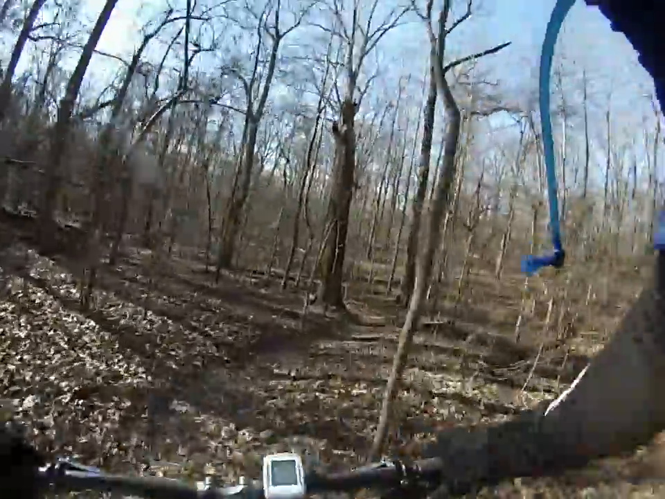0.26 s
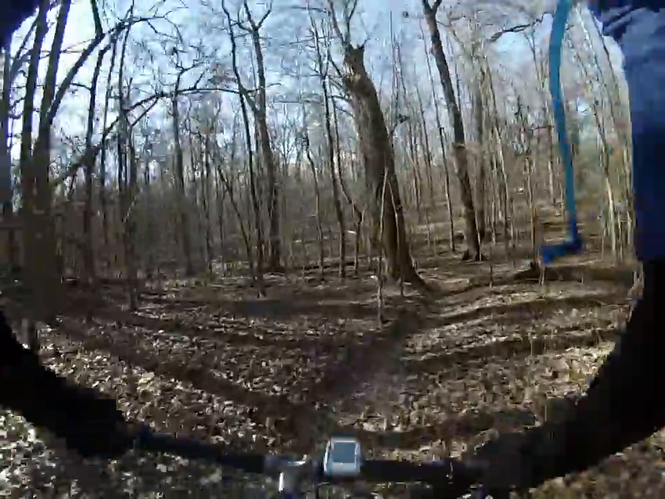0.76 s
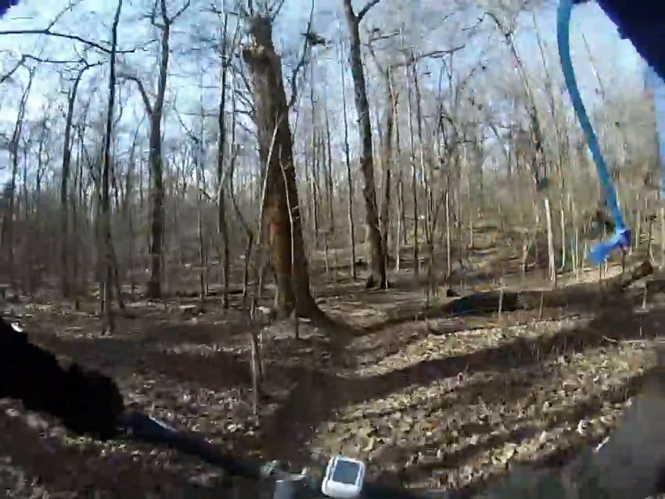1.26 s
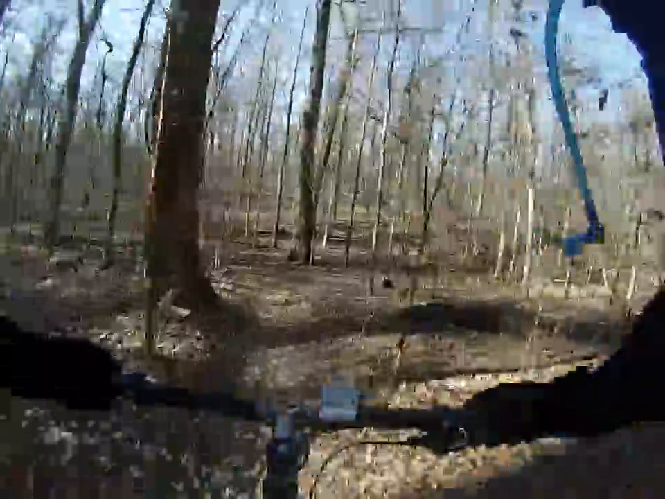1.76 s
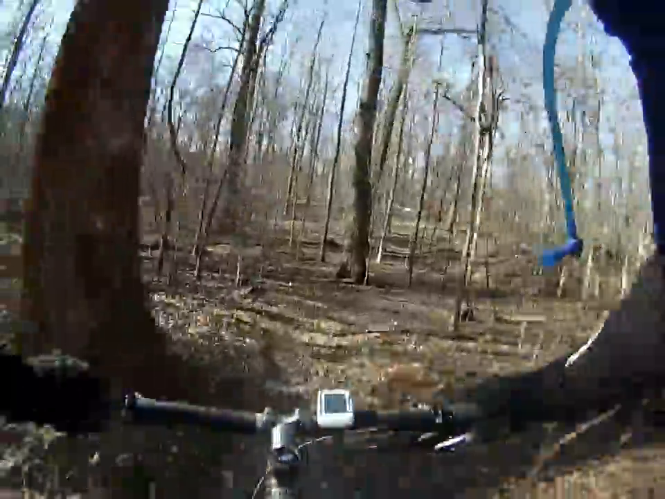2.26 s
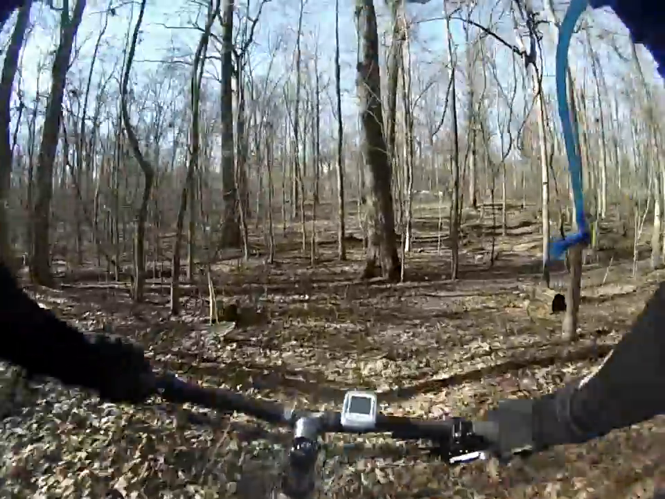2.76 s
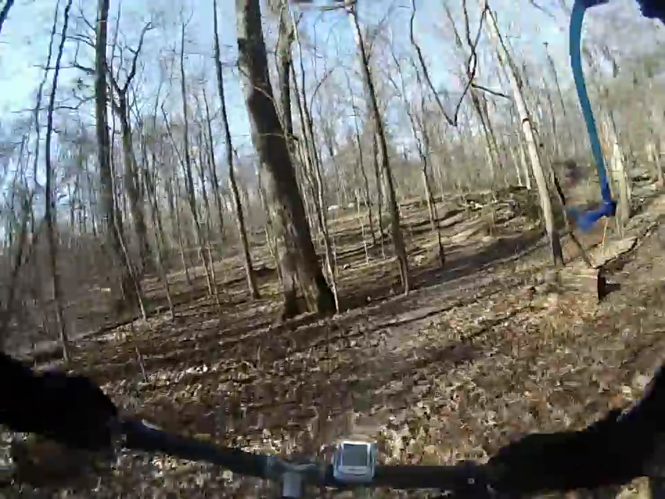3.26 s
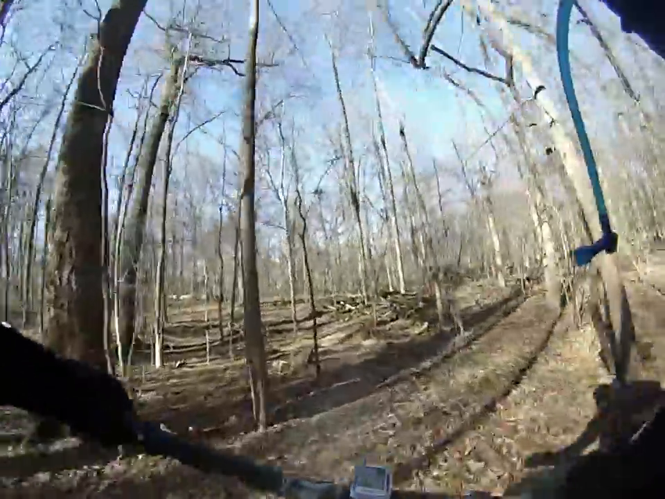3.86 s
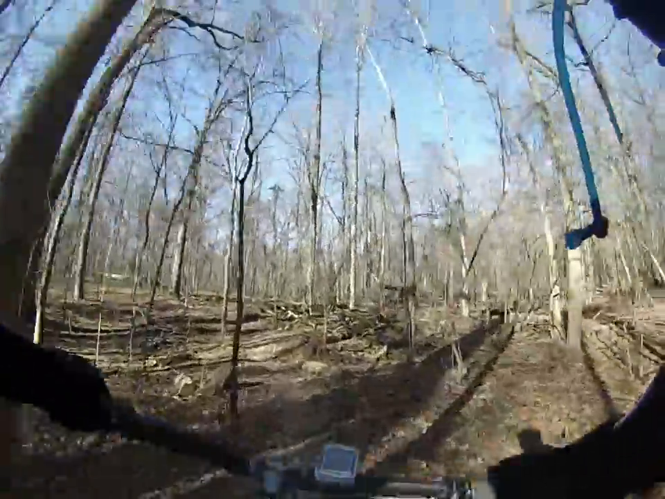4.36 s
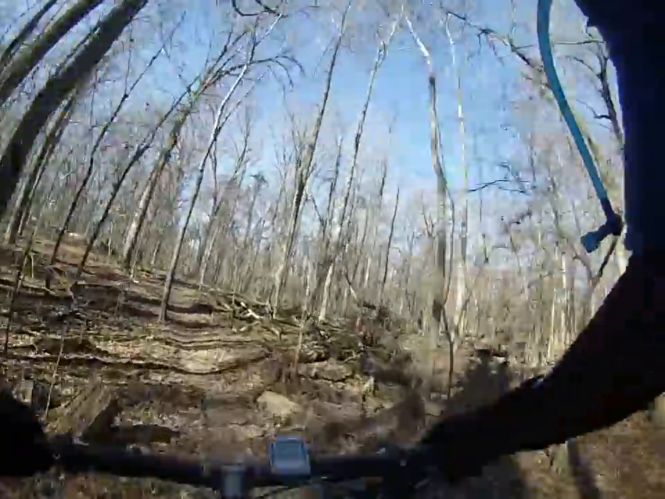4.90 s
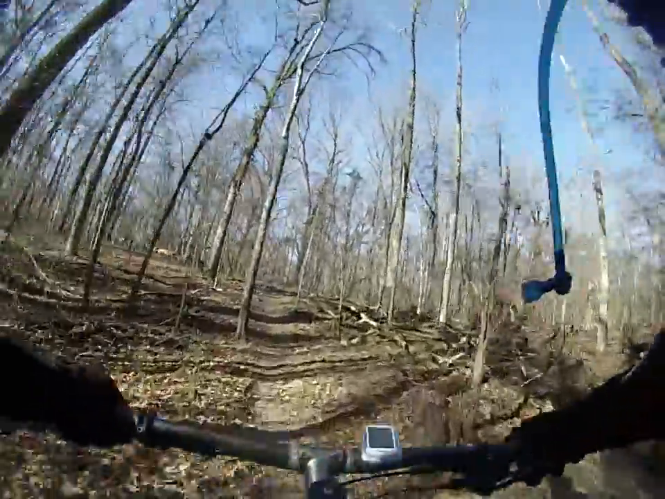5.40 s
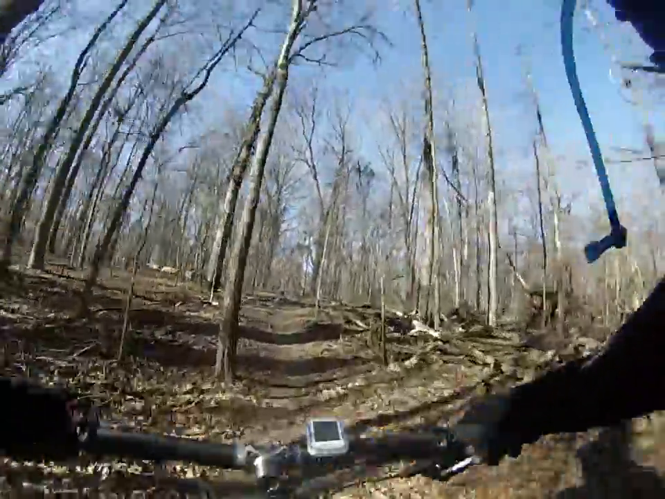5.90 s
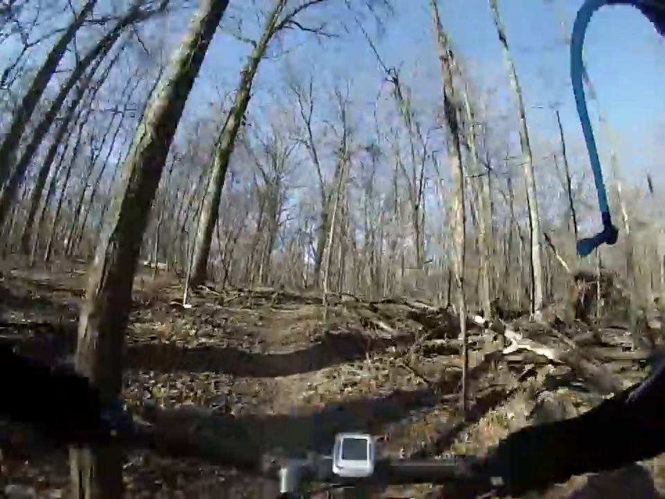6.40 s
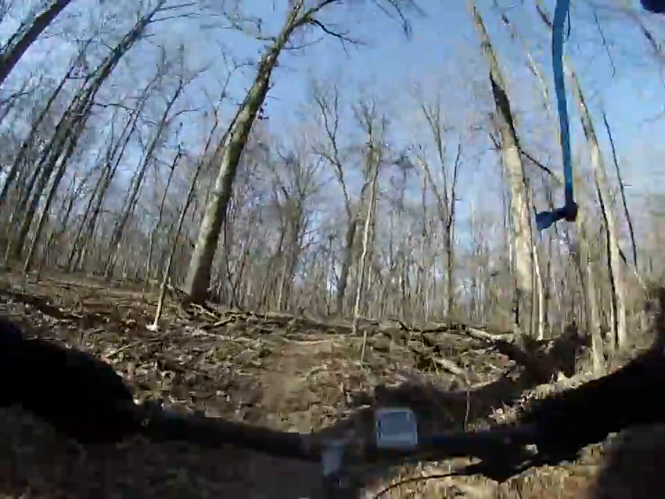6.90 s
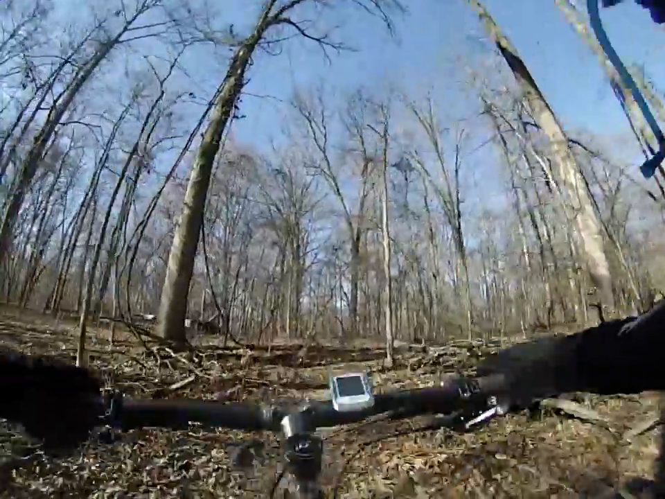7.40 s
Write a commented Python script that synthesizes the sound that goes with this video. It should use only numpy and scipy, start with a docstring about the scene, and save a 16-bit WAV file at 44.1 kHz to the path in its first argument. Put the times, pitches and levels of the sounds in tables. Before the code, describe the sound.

A mountain bike crunches through dry leaves on a dirt trail, chain rattling and frame knocking over roots, with low wind buffeting the microphone.

```python
"""A low buffet and a rattling chain come first, over the crunch of dry leaves under a mountain bike's tyres.
It rolls down a dirt trail, with one cased microphone close by, in the camera on the rider's chest.
The tyres crush leaves (filtered noise and fractures), snap twigs and thud on roots; chain and frame knock.
Bumps and pedal strokes swing the camera in slow pulses, and the brake disc rings in decaying sines.
Wind presses on the case as lumpy low noise, and the resonances of the case colour everything."""
import sys
import numpy as np
from scipy.fft import rfft, irfft, next_fast_len
from scipy.io import wavfile
from scipy.ndimage import map_coordinates

SR = 44100
rng = np.random.default_rng(int(sys.argv[2]) if len(sys.argv) > 2 else 0)


def unload_wav(signal):
    """Save mono or channel-first audio to the path in sys.argv[1] as 16-bit WAV at rate SR, clipped to [-1, 1]."""
    wavfile.write(
        sys.argv[1],
        SR,
        np.round(np.clip(np.atleast_2d(signal).T, -1, 1) * 32767).astype(np.int16),
    )


N = 337365

# roughness of the trail, as tyre rumble before trims: (time [s], level [dB])
TRAIL_ROUGHNESS = [(0, -53.5), (.3, -58), (1.2, -57), (2.0, -58), (2.9, -55.5), (3.6, -53.5), (4.0, -58.5),
                   (4.35, -57), (5.0, -56), (5.9, -57.5), (6.4, -53), (6.8, -54.5), (7.3, -51.5),
                   (7.62, -57)]
# tyres meeting roots and stones, before trims: (time [s], level [dB], thud pitch [Hz])
ROOT_HITS = [(.4, -40.5, 108), (0.469, -52, 231), (.517, -65, 270), (0.621, -51, 182), (.663, -44, 116),
             (0.747, -43, 129), (0.843, -42, 119), (1.194, -43, 159), (1.428, -46, 119), (1.667, -45, 144),
             (1.805, -55, 140), (2.2, -42, 152), (2.435, -54, 110), (2.59, -37.5, 108), (2.958, -35.5, 101),
             (2.997, -42, 180), (3.17, -43.5, 200), (3.251, -47, 132), (3.335, -42, 94.5),
             (3.402, -49, 123), (3.5, -39.5, 133), (3.541, -48, 150), (3.619, -44, 125), (3.672, -46, 164),
             (3.758, -45, 115), (3.952, -45.5, 375), (3.999, -47, 225), (4.179, -42.5, 180),
             (4.576, -43.5, 95), (5.44, -45, 181), (5.815, -47, 140), (5.469, -46.5, 240),
             (6.024, -38, 115), (6.188, -41, 131), (6.267, -45.5, 156), (6.307, -36, 164),
             (6.344, -35, 153), (6.427, -31.5, 126), (6.498, -41, 127), (6.661, -32.5, 122),
             (6.686, -36.5, 151), (7.17, -41.5, 164), (7.276, -43, 118), (7.324, -50, 150),
             (7.487, -35.5, 149), (7.53, -47, 108), (7.614, -35.5, 125), (7.629, -50, 305)]
# spectrum of tyre on dirt: (frequency [Hz], relative density [dB per Hz])
DIRT_SPECTRUM = [(30, -30), (70, 3), (110, 1.5), (175, -2), (230, -9.5), (350, -13), (600, -17),
                 (1200, -23.5), (4000, -89.5)]
# spectrum of crisp leaf splinters: (frequency [Hz], relative density [dB per Hz])
CRISP_SPECTRUM = [(1000, -50), (4000, -0.5), (7000, 0), (9500, 1), (12000, -4), (14000, -18), (15500, -35)]


def amp(db):
    """Decibels to gain."""
    return 10 ** (np.asarray(db) / 20)


def unit(x):
    """Scale to rms 1."""
    return x / np.sqrt(np.mean(x ** 2) + 1e-20)


def curves(rows):
    """One value per sample for each column after the time."""
    times, *columns = np.transpose(rows)
    return [np.interp(np.arange(N) / SR, times, column) for column in columns]


def wobble(rate):
    """A smooth random curve, rate knots a second."""
    knots = rng.standard_normal(int(N * rate / SR) + 4)
    return map_coordinates(knots, [np.arange(N) * rate / SR])


def add(track, s, sound):
    """Mix a sound into a track from time s on."""
    start = int(np.clip(round(s * SR), 0, N))
    track[start:start + len(sound)] += sound[:N - start]


def causal(x, level_of):
    """Minimum-phase filter whose gain in dB is a function of frequency."""
    size = 2 * next_fast_len(N // 2 + SR // 4)
    cepstrum = irfft(np.log(amp(level_of(np.fft.rfftfreq(size, 1 / SR)))), size)
    # folding the cepstrum forward in time makes the phase minimum
    cepstrum[1:size // 2] *= 2
    cepstrum[size // 2 + 1:] = 0
    return irfft(rfft(x, size) * np.exp(rfft(cepstrum)), size)[:N]


def colour(x, spectrum):
    """Give x a spectrum; white noise keeps its power."""
    f, db = np.transpose(spectrum)

    def level_of(hz):
        level = np.interp(np.log(hz + 1), np.log(f), db)
        return level - 10 * np.log10(np.mean(amp(level) ** 2))
    return causal(x, level_of)


def grains(rate, spread_db):
    """Tiny fractures at random moments with capped log-normal sizes, rms 1."""
    breaks = rng.random(N) < rate / SR
    size = np.minimum(rng.standard_normal(N), 2.5)
    return unit(breaks * amp(spread_db * size) * rng.choice([-1, 1], N))


def burst(t60, rise):
    """A short spray of contacts, as noise that swells and dies."""
    t = np.arange(SR // 5) / SR
    shape = amp(-60 * t / max(t60, 1e-3)) * (1 - np.exp(-t / rise))
    return shape / shape.max() * rng.standard_normal(len(t))


def struck(hz, t60, rise):
    """One damped mode after a blow, its envelope peaking at 1."""
    t = np.arange(SR // 5) / SR
    shape = amp(-60 * t / t60) * (1 - np.exp(-t / rise))
    return shape / shape.max() * np.sin(2 * np.pi * hz * t)


def tear(length, t60, fibres_per_s=4500):
    """Fibres give way in a quick uneven run that dies away after length seconds."""
    t = np.arange(SR // 5) / SR
    shape = amp(-60 * np.maximum(t - length, 0) / t60)
    breaks = (rng.random(len(t)) < fibres_per_s / SR) | (t == 0)
    run = shape * breaks * rng.choice([-1, 1], len(t))
    # the same energy, however many fibres happen to break
    return run * np.linalg.norm(shape) / np.linalg.norm(run)


def swells(events, rise, t60):
    """Sum of attack-hold-release envelopes, one for each (s, hold s, gain)."""
    out, t = np.zeros(N), np.arange(SR // 2) / SR
    for s, hold, gain in events:
        add(out, s, gain * (1 - np.exp(-t / rise)) * amp(-60 * np.maximum(t - hold, 0) / t60))
    return out


def load_db():
    """Change of level in dB with the weight on the wheels, mostly brief dips as they go light."""
    # the wheels go light between bumps: (middle time [s], half length [s], level change [dB])
    light_spells = [(3.312, 0.009, 0.5), (6.57, 0.025, -2), (6.79, 0.045, -2), (7.02, 0.016, -1.5),
                    (7.258, 0.0072, -6), (7.38, .02, -1.5)]
    t = np.arange(N) / SR
    return sum(db * np.exp(-((t - s) / half) ** 2) for s, half, db in light_spells)


def leaf_levels():
    """Crunch and crackle in dB: the litter under the weight of the wheels, deepened by each heap."""
    # leaf litter under the tyres, before trims: (time [s], crunch level [dB], crisp crackle level [dB])
    litter = [(0, -52.5, -61.5), (.2, -53, -62.5), (.5, -51, -61), (.97, -55.5, -65), (1.12, -53, -63),
              (1.95, -52.5, -61), (3.4, -53, -63), (3.75, -49, -58.5), (3.95, -55.5, -60.5),
              (4.25, -52.5, -61.5), (4.53, -56, -66), (5.05, -57, -66), (5.3, -55, -64.5),
              (5.65, -50.5, -59.5), (6.05, -54, -67), (6.9, -56, -67), (7.25, -53, -65), (7.62, -57.5, -67)]
    # heaps the wheels plough through: (time [s], length [s], level aimed at over the litter [dB])
    leaf_heaps = [(0.021, 0.01, 6), (.28, 0.1, 2.5), (1.568, 0.036, 4), (5.097, 0.1, 3), (5.435, 0.15, 3.5),
                  (6.516, .035, 1), (7.035, 0.13, 1), (7.393, 0.031, 2.5)]
    extra = [(s, length, amp(db) - 1) for s, length, db in leaf_heaps]
    heaped = swells(extra, rise=0.0037, t60=0.04)
    return np.array(curves(litter)) + load_db() + 20 * np.log10(1 + heaped)


def shaking():
    """Gain of the bike's loose parts: it grows faster than the tyre rumble on rough ground."""
    at_reference_db, ground_reference_db, growth = -67, -59, 1.6  # growth in dB per dB of rumble
    ground_db = curves(TRAIL_ROUGHNESS)[0] + load_db()
    return amp(at_reference_db + growth * (ground_db - ground_reference_db))


def wind(gust_db=1.0):
    """Eddies press on the case in slow lumps of low noise."""
    # air on the camera: (time [s], level [dB])
    gusts = [(0, -32), (.6, -41), (1.1, -36.5), (1.35, -32), (1.7, -42), (2.05, -30.5), (2.35, -40),
             (2.7, -38), (2.9, -35.5), (3.45, -37.5), (3.78, -31), (3.88, -36.5), (4.02, -37.5),
             (4.12, -34), (4.28, -42.5), (4.45, -44), (5.1, -39), (5.6, -45), (6.1, -34), (6.4, -28),
             (6.6, -36), (6.85, -41.5), (7.0, -33), (7.25, -29), (7.62, -31.5)]
    # spectrum of the eddies: (frequency [Hz], relative density [dB per Hz])
    buffet_spectrum = [(5, -21), (14, 9.5), (24, -8), (35, -7), (50, -20), (75, -24), (95, -29.5),
                       (130, -36.5), (300, -65), (1000, -120)]
    lumps = amp(gust_db * wobble(16))
    pressure = colour(rng.standard_normal(N), buffet_spectrum)
    return amp(curves(gusts)[0]) * unit(lumps * pressure)


def jolts(cycles=0.19, trim_db=2.0):
    """Each pedal stroke and each bump swings the camera through about one slow cycle of pressure."""
    # bumps that heave the camera, before trim: (middle time [s], level [dB])
    bumps = [(0.071, -21), (0.42, -32), (0.793, -25.5), (1.057, -26.5), (1.239, -28), (2.451, -27),
             (2.942, -21.5), (3.174, -23.5), (3.344, -15.5), (3.611, -31), (3.754, -25.5), (3.821, -27),
             (4.095, -31), (5.151, -40), (6.028, -27), (6.302, -23), (6.438, -17), (6.686, -18.5),
             (7.191, -26), (7.288, -19.5), (7.472, -25), (7.6, -36)]
    # downstrokes rocking the rider's chest, one after another, before trim: (level [dB])
    strokes = [-31, -27, -34, -40, -27, -34, -23.5, -38, -25, -46, -33, -25, -29, -28, -32.5, -31.5, -29,
               -34, -34]
    first_s, period_s, pedal_hz, bump_hz = .225, .398, 31.8, 21.7
    swings = [(first_s + k * period_s, db, pedal_hz) for k, db in enumerate(strokes)]
    swings += [(s, db, bump_hz) for s, db in bumps]
    out, t = np.zeros(N), np.arange(N) / SR
    for s, db, hz in swings:
        near = np.abs(t - s) < .1
        turn = (t[near] - s) * hz
        pulse = np.sin(2 * np.pi * (turn + rng.random())) / np.cosh(turn / cycles)
        out[near] += amp(db + trim_db) * pulse
    return out


def chatter(trim_db=-4, fits_db=1.5):
    """Chain and cables tick against the frame as the bike shakes, and in fits when the chain is thrown."""
    # the chain is thrown about, before trim: (time [s], length [s], level [dB])
    throws = [(0, 0.12, -59.5), (0.413, .03, -55.5), (0.645, 0.053, -58), (0.776, 0.064, -54),
              (1.11, 0.08, -53), (1.436, 0.021, -56), (2.943, 0.023, -53), (3.003, 0.032, -56),
              (3.1, 0.11, -59), (3.462, 0.037, -53), (6.005, 0.11, -67), (6.26, 0.06, -54.5),
              (6.415, 0.018, -70), (6.635, 0.04, -49.5), (6.886, 0.037, -54.5), (7.158, 0.06, -54.5),
              (7.27, 0.06, -61), (7.41, 0.067, -56.5), (7.562, 0.021, -53), (7.592, 0.05, -54)]
    # spectrum of the ticking: (frequency [Hz], relative density [dB per Hz])
    tick_spectrum = [(150, -35), (450, -5.5), (700, 0.5), (1050, -5.5), (1500, 1.5), (2200, -1.5),
                     (3500, -10.5), (9000, -73)]
    thrown = swells([(s, length, amp(db)) for s, length, db in throws], rise=0.0014, t60=0.26)
    ticks = unit(grains(rate=350, spread_db=3.5) + rng.standard_normal(N))
    fits = unit(amp(fits_db * wobble(40)))
    return amp(trim_db) * np.hypot(shaking(), thrown) * colour(ticks * fits, tick_spectrum)


def pings(trim_db=-2, rise=0.00019):
    """A flicked steel part rings with one clear note."""
    # light steel parts, perhaps spokes, before trim: (time [s], level [dB], pitch [Hz], t60 [s])
    flicks = [(2.5215, -49.5, 2230, 0.037), (5.1688, -45, 2210, 0.026), (5.5135, -46, 2210, 0.034),
              (5.536, -56, 2080, .06), (5.6415, -47, 2175, 0.019)]
    out = np.zeros(N)
    for s, db, hz, t60 in flicks:
        add(out, s, amp(db + trim_db) * struck(hz, t60, rise))
    return out


def chirps(waver_hz=60, flicker_db=3):
    """Brief stick-slip squeaks on the upper modes of the disc."""
    # light touches of the pad: (middle time [s], level [dB], pitch [Hz], half length [s])
    touches = [(6.345, -65, 7200, .01), (7.197, -60, 4380, 0.013), (7.244, -63, 5170, 0.017),
               (7.282, -66, 5170, .011), (7.553, -63, 7250, .006), (7.555, -59, 6550, .007)]
    out, t = np.zeros(N), np.arange(N) / SR
    drift = 2 * np.pi * np.cumsum(waver_hz * wobble(300)) / SR
    for s, db, hz, half in touches:
        near = np.abs(t - s) < .1
        shape = np.exp(-((t[near] - s) / half) ** 2)
        out[near] += amp(db) * shape * np.sin(2 * np.pi * hz * t[near] + drift[near])
    return out * unit(amp(flicker_db * wobble(150)))


def disc(trim_db=-6, waver_hz=6, flicker_db=0.8, shaken_db=-3):
    """The steel disc sings while the pad touches it, then rings out; shaking keeps it faintly alive."""
    # the disc brushes its pad, before trim: (time [s], level [dB], contact [s])
    brushes = [(.03, -52, 0.071), (0.17, -37.5, 0.0069), (.642, -40, 0.011), (.81, -53, .02),
               (.913, -40, 0.024), (0.959, -46, 0.045), (1.14, -57, .04), (1.40, -47, 0.016),
               (1.45, -52, 0.15), (2.194, -41, 0.036), (2.365, -45.5, 0.028), (2.427, -44, 0.016),
               (2.9, -47, 0.033), (3.04, -42.5, 0.01), (3.075, -52.5, .05), (3.235, -41, 0.013),
               (3.255, -47, .006), (3.347, -43.5, 0.027), (3.408, -44, 0.016), (3.449, -33.5, 0.0099),
               (3.655, -40, 0.014), (3.70, -52, .19), (4.4, -50, .02), (5.21, -46, 0.0087),
               (5.44, -53, 0.037), (5.577, -44, 0.014), (5.641, -42, 0.0066), (5.672, -46.5, .018),
               (5.845, -44, 0.01), (5.887, -44, 0.041), (6.02, -50, .01), (6.1, -45, 0.026),
               (6.345, -43, 0.06), (6.82, -48.5, 0.057), (6.956, -41.5, .03), (7.02, -49.5, 0.11),
               (7.125, -49, 0.018), (7.214, -45.5, 0.067), (7.3, -49, .055), (7.42, -49, 0.017),
               (7.542, -41, 0.013)]
    # modes of the disc: (frequency [Hz], relative level [dB])
    modes = [(1725, -8), (3810, -37), (5200, -48), (7260, -33)]
    rubbed = swells([(s, contact, amp(db)) for s, db, contact in brushes], rise=0.0017, t60=0.13)
    drive = np.hypot(rubbed, amp(shaken_db) * shaking() * wobble(33))
    ring = np.zeros(N)
    for hz, db in modes:
        phase = 2 * np.pi * np.cumsum(hz + waver_hz * wobble(90)) / SR
        ring += amp(db + flicker_db * wobble(56)) * np.sin(phase)
    return amp(trim_db) * drive * ring


def knocks(clack_db=-3, push_db=23, scrape_db=-22, bounce_s=0.00261, bounce_db=-8):
    """Hard contacts: a dry clack and a dull push on the frame, then a small bounce, a rattle and a scrape."""
    # chain and frame, before trims: (time [s], level [dB], clack pitch [Hz], hollow body re level [dB])
    hits = [(0.4757, -37.5, 1990, -27), (0.7382, -37, 2390, -30), (1.159, -41, 1700, -28),
            (1.2487, -43, 2210, -32), (1.44, -48.5, 1700, -10), (2.958, -38, 2060, -18),
            (3.2563, -35.5, 1600, -15), (3.26, -47, 1500, -14), (3.486, -46, 1500, -7),
            (3.4999, -40, 1730, -13), (3.5035, -43, 1900, -9.5), (3.5495, -43, 2200, -34),
            (4.3985, -43.5, 2150, -16), (4.955, -44.5, 1930, -19), (5.2132, -41, 1450, -25),
            (6.0263, -38.5, 1500, -31), (6.16, -34.5, 1800, -26), (6.273, -37.5, 1390, -23),
            (6.3095, -40, 1710, -25), (6.3903, -38.5, 1400, -26), (6.433, -50, 1500, -8),
            (6.462, -42, 1360, -34), (6.664, -38, 1790, -25), (6.6766, -37, 2130, -22),
            (6.681, -43, 1300, -23), (6.86, -37.5, 1800, -28), (6.9527, -44, 1500, -6),
            (7.1448, -38.5, 1750, -24), (7.1782, -39, 1890, -23), (7.2955, -38.5, 1980, -22),
            (7.3298, -39.5, 2070, -18), (7.436, -42, 1800, -18), (7.463, -49, 1860, -7),
            (7.489, -40, 1400, -23), (7.6003, -41, 1950, -5), (7.6115, -43, 1860, -19),
            (7.619, -44, 1800, -3), (7.6245, -55, 1900, -14)]
    # broad, heavily damped body of the frame: (frequency [Hz], relative density [dB per Hz])
    hollow_spectrum = [(150, -4.5), (400, -11.5), (600, 4), (800, 5), (1050, -7), (1350, 3), (2000, -15),
                       (3000, -23), (8000, -57)]
    # spectrum of the scrape: (frequency [Hz], relative density [dB per Hz])
    scrape_spectrum = [(300, -23), (1000, -4), (1450, 17), (2000, -20), (3000, 8.5), (6000, -25),
                       (15000, -20.5)]
    clack, body, scrape = np.zeros((3, N))
    for s, db, hz, hollow_db in hits:
        bounce_delay = bounce_s * (1 + .5 * rng.random())
        for delay, loss_db in [(0, 0), (bounce_delay, bounce_db)]:
            add(clack, s + delay, amp(db + clack_db + loss_db) * struck(hz, t60=0.0075, rise=0.0001))
            # a single-sample push, which the frame's spectrum turns into a dull note
            add(body, s + delay, amp([db + hollow_db + push_db + loss_db]))
        add(body, s, amp(db + hollow_db) * burst(t60=0.037, rise=0.0024))
        add(scrape, s, amp(db + scrape_db) * burst(t60=0.12, rise=0.00028))
    return clack + colour(body, hollow_spectrum) + colour(scrape, scrape_spectrum)


def thuds(trim_db=-2, cycles=6, grit_db=-14):
    """The soft tyre takes a root with a dull note of a few cycles and scuffs the dirt."""
    note, grit = np.zeros(N), np.zeros(N)
    for s, db, hz in ROOT_HITS:
        add(note, s, amp(db + trim_db) * struck(hz, cycles / hz, rise=0.0028))
        add(grit, s, amp(db + grit_db) * burst(t60=0.028, rise=0.0034))
    return note + colour(grit, DIRT_SPECTRUM)


def snaps(crack_db=-6, stir_db=-13, splinter_db=-6):
    """A twig cracks as its fibres tear, stirs the leaves around it and throws off bright splinters."""
    # twigs breaking, before trims: (time [s], level [dB], bright splinter re level [dB], tearing time [s])
    twigs = [(0.358, -35, -16, 0.0046), (0.433, -53, -16, 0.0044), (0.734, -53, 0, 0.0046),
             (0.8026, -48.5, 0, .005), (1.035, -54, 3, .003), (1.605, -48, -13, .004),
             (2.052, -47, -6, .002), (2.082, -57, -8, .003), (2.642, -50.5, 0.5, 0.0045),
             (2.703, -55, 6, .003), (2.875, -54.5, 7.5, 0.0027), (2.8994, -48, -14, .003),
             (3.1306, -45.5, -7, 0.0037), (3.295, -48, -1, 0.0027), (4.741, -50, -25, .004),
             (5.098, -57, -8, 0.0048), (5.112, -53, -6, .005), (5.141, -49, -14, 0.0035),
             (5.37, -54.5, 3, 0.013), (5.418, -48.5, -4, 0.0074), (5.452, -55, 9, 0.007),
             (5.498, -47, -3, .003), (5.516, -49, -6, 0.0053), (5.547, -64, -6, .003),
             (5.577, -51, -2, 0.0035), (5.6, -45.5, -7, 0.0033), (5.618, -50, -2, 0.0062),
             (5.879, -52, 0, .003), (6.121, -47, -26, 0.0054), (6.168, -47, -4, 0.0063),
             (6.205, -45.5, -28, 0.0075), (6.216, -57, -24, 0.0054), (6.767, -52, -15, 0.0038),
             (7.035, -49, -2, 0.0065), (7.056, -49, 0.5, 0.0047)]
    # spectrum of the crack: (frequency [Hz], relative density [dB per Hz])
    twig_spectrum = [(300, -6), (1200, 12), (2000, 22.5), (3500, 22.5), (4700, 18.5), (5600, 14), (7000, 3),
                     (15000, -6)]
    crack, bright = np.zeros(N), np.zeros(N)
    for s, db, bright_db, length in twigs:
        stir = amp(stir_db) * burst(t60=0.14, rise=0.016)
        add(crack, s, amp(db + crack_db) * (tear(length, t60=0.017) + stir))
        add(bright, s, amp(db + bright_db + splinter_db) * burst(t60=0.051, rise=0.00079))
    flakes = unit(amp(1.2 * wobble(690)))
    return colour(crack, twig_spectrum) + colour(bright * flakes, CRISP_SPECTRUM)


def stalks(per_second=45, trim_db=-3, spread_db=3, centre_hz=3300, cycles=14):
    """Stiff stalks and leaf ribs break singly, each with a short tick of its own pitch."""
    out, crunch_db = np.zeros(N), leaf_levels()[0]
    for place, size, pitch in rng.random((int(per_second * N / SR), 3)):
        # within an octave either side of the centre
        hz = np.clip(centre_hz * 2 ** (2 * pitch - 1), 500, 12000)
        db = crunch_db[int(place * N)] + trim_db - spread_db * np.log(size + 0.33)
        add(out, place * N / SR, amp(db) * struck(hz, cycles / hz, rise=0.00025))
    return out


def tyre_rumble(trim_db=-2, shudder_db=-9):
    """Knobs drum on the dirt as low noise, shuddering on after thuds and over runs of roots and stones."""
    # runs of roots and stones, before trim: (time [s], length [s], level [dB])
    root_runs = [(3.338, 0.023, -49), (3.543, 0.018, -54), (4.078, 0.082, -56.5), (6.012, 0.018, -52),
                 (6.295, 0.041, -44), (6.415, 0.015, -50), (6.625, .03, -58), (6.665, 0.024, -40.5),
                 (7.269, 0.07, -50.5), (7.465, .025, -50), (7.617, .04, -40)]
    after_thuds = [(s, 0, amp(db + shudder_db)) for s, db, hz in ROOT_HITS]
    shudder = swells(after_thuds, rise=0.0078, t60=0.23)
    judder = swells([(s, length, amp(db)) for s, length, db in root_runs], rise=0.0059, t60=0.03)
    rolling = amp(curves(TRAIL_ROUGHNESS)[0] + load_db())
    strength = np.sqrt(rolling ** 2 + shudder ** 2 + judder ** 2)
    drumming = unit(amp(2.23 * wobble(35)) * colour(rng.standard_normal(N), DIRT_SPECTRUM))
    return amp(trim_db) * strength * drumming


def crushed_leaves(crunch_trim_db=-5.5, crackle_trim_db=-2, clump_db=1.02, flutter_db=1.5, bed_db=-3):
    """Leaves break clump by clump: single fractures stand out of a bed of countless small ones."""
    # spectrum of the crunch: (frequency [Hz], relative density [dB per Hz])
    crunch_spectrum = [(100, -12.5), (400, -1), (1000, -4.5), (2000, 3), (3300, 3), (5500, -10),
                       (7000, -6.5), (10000, -37.5), (15000, -8)]
    crunch_db, crackle_db = leaf_levels()
    clumps = unit(amp(clump_db * wobble(35) + flutter_db * wobble(220)))
    crushed = unit(grains(rate=2200, spread_db=3) + amp(bed_db) * rng.standard_normal(N))
    crisp = grains(rate=1400, spread_db=13.0) + amp(7.5) * rng.standard_normal(N)
    splinters = unit(amp(0.34 * wobble(40)) * crisp)
    crunch = amp(crunch_db + crunch_trim_db) * colour(clumps * crushed, crunch_spectrum)
    crackle = amp(crackle_db + crackle_trim_db) * colour(clumps * splinters, CRISP_SPECTRUM)
    return crunch + crackle


def scene():
    """Everything reaches the one microphone from close by, with no echo."""
    bike = chatter() + pings() + chirps() + disc() + knocks()
    ground = thuds() + snaps() + stalks() + tyre_rumble() + crushed_leaves()
    return (wind() + jolts() + bike + ground)[None]


def record(dry):
    """The case rings at its resonances; the camera keeps nothing above its band limit."""
    # resonances and notches of the camera case: (frequency [Hz], width [Hz], gain [dB])
    case_modes = [(277.5, 62, 5.5), (640, 27, 3), (706, 50, -3.5), (794, 42, 2.5), (1310, 99, 4),
                  (1603, 40, 5.5), (1687, 140, 5.5), (1968, 433, 8), (2282, 290, 6.5), (2650, 78, 5.5),
                  (2995, 190, 3), (3878, 300, 9.5), (4242, 430, 10.5), (4747, 225, 10), (4790, 67, -10),
                  (5060, 270, 5.5), (5503, 680, 10.5), (6130, 500, 5), (7250, 330, 2), (7870, 530, -1.5),
                  (10850, 400, -2.5), (11600, 990, 2.5), (13200, 930, 6.5), (14900, 1000, -7)]
    top_hz = 15200

    def case_gain_db(f):
        return sum(db * np.exp2(-(2 * (f - hz) / width) ** 2) for hz, width, db in case_modes)
    cased = causal(dry[0], case_gain_db)
    size = next_fast_len(N + SR // 4)
    kept = np.fft.rfftfreq(size, 1 / SR) < top_hz
    return irfft(rfft(cased, size) * kept, size)[None, :N]


dry = scene()
out = record(dry)
unload_wav(out)
```